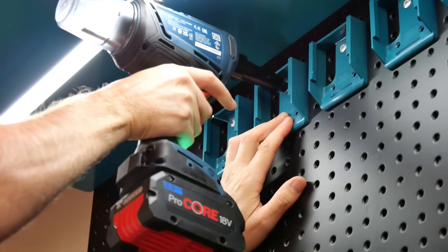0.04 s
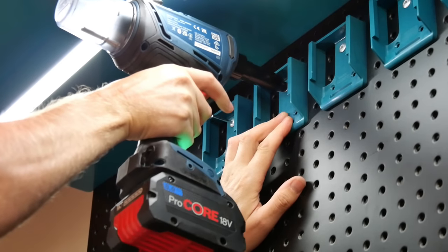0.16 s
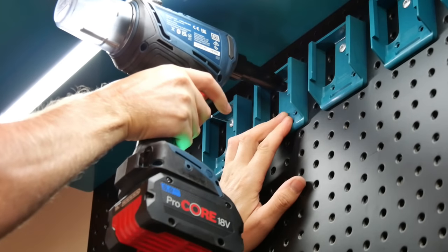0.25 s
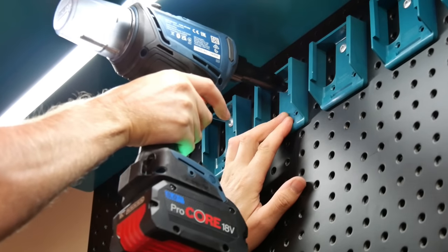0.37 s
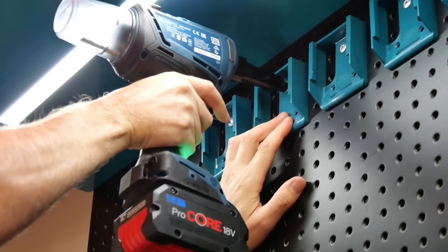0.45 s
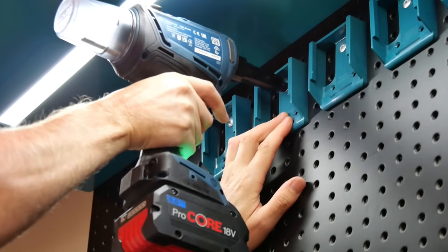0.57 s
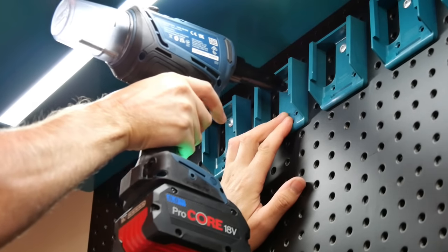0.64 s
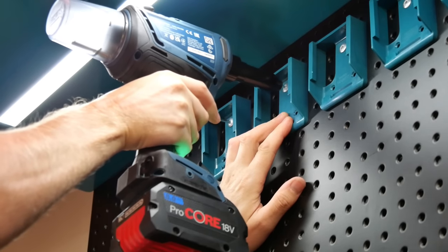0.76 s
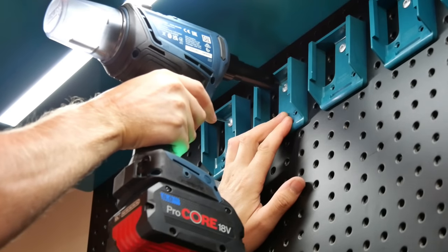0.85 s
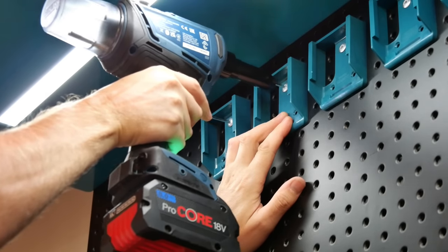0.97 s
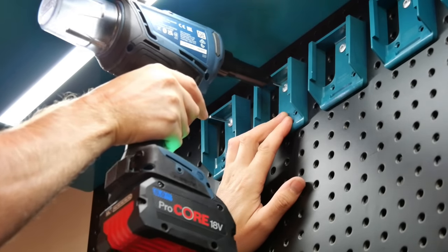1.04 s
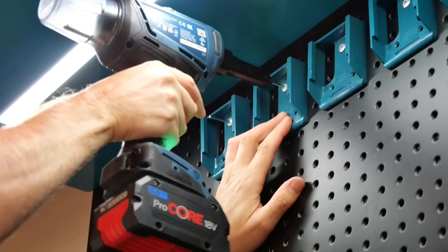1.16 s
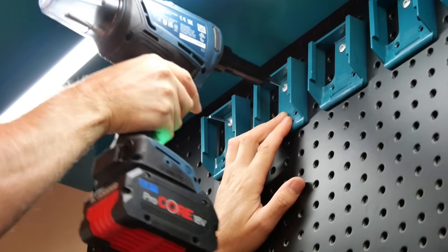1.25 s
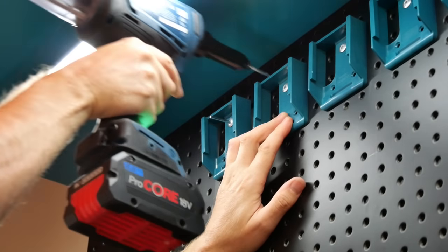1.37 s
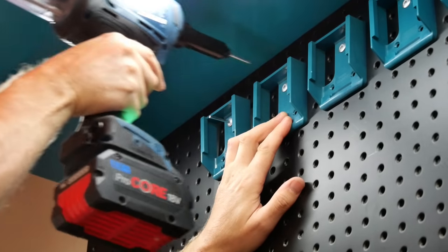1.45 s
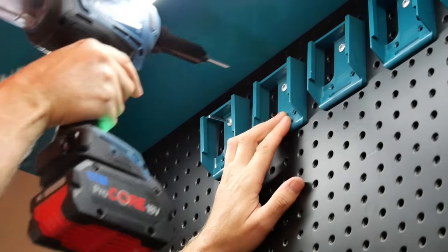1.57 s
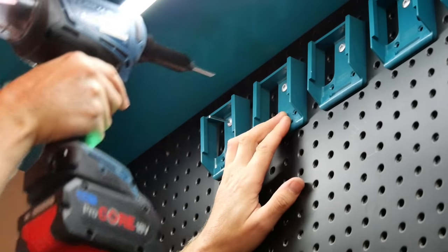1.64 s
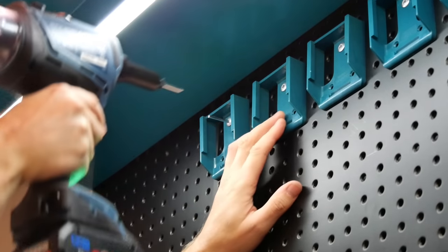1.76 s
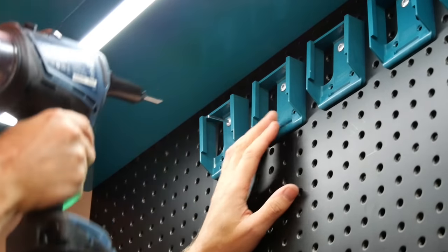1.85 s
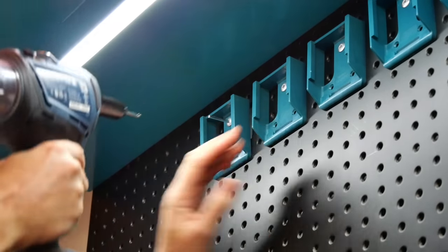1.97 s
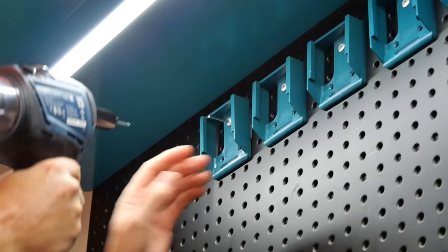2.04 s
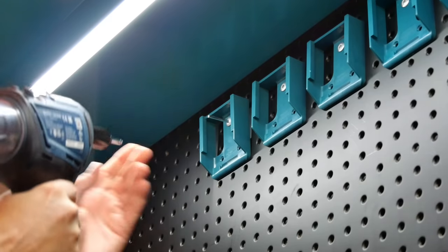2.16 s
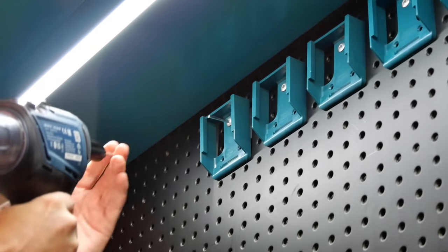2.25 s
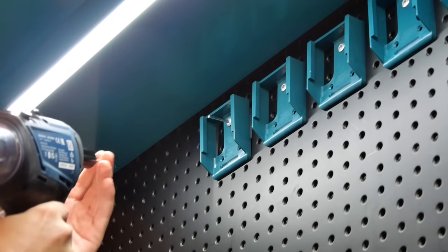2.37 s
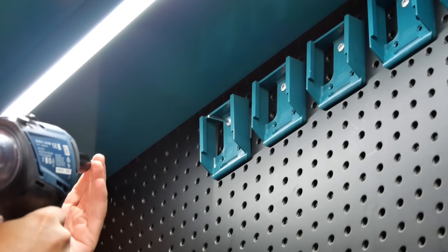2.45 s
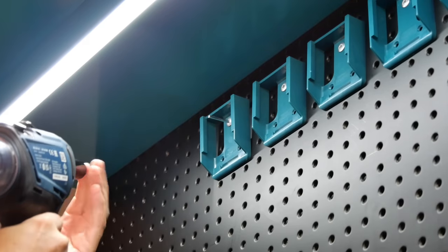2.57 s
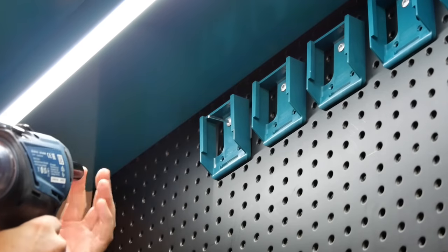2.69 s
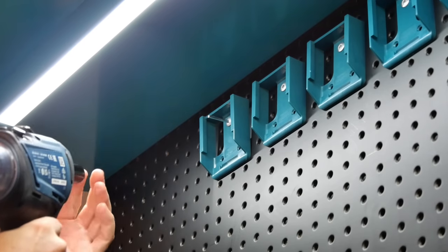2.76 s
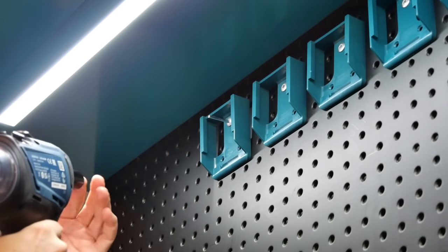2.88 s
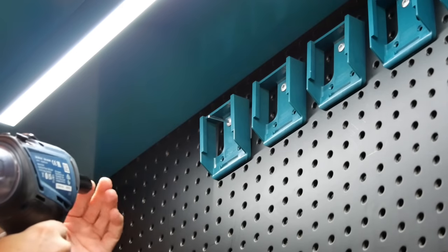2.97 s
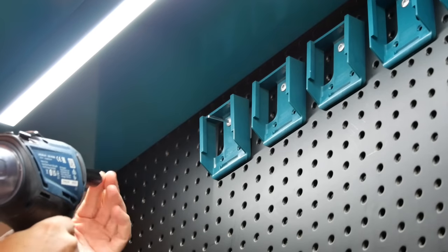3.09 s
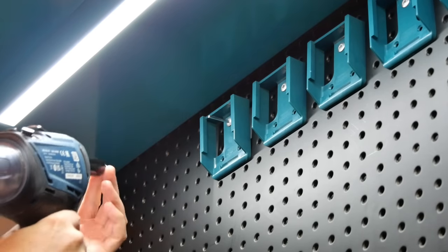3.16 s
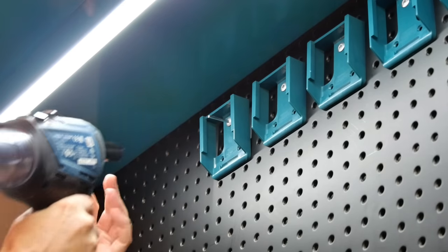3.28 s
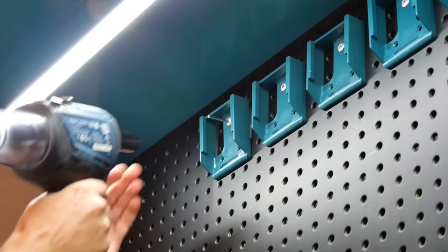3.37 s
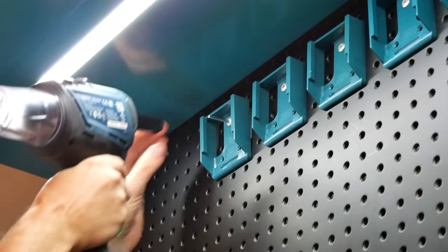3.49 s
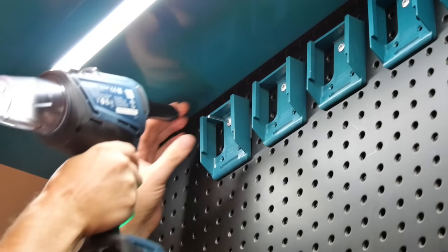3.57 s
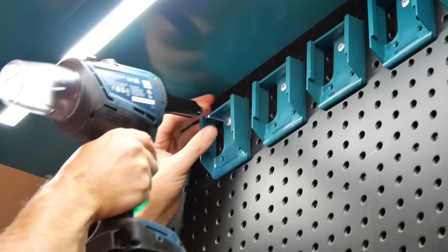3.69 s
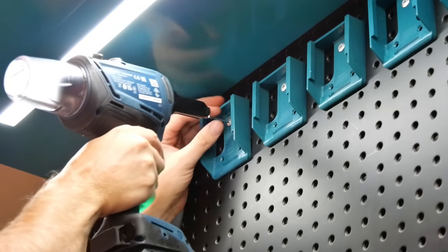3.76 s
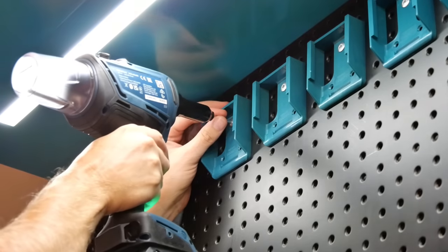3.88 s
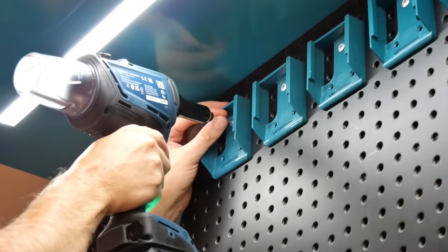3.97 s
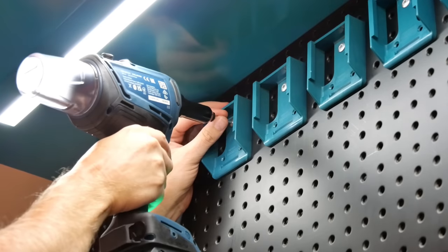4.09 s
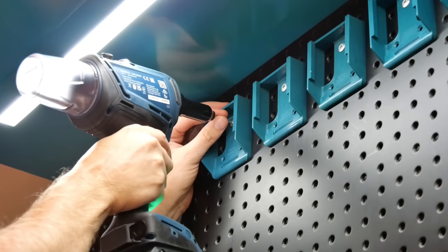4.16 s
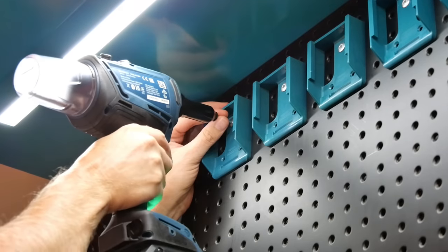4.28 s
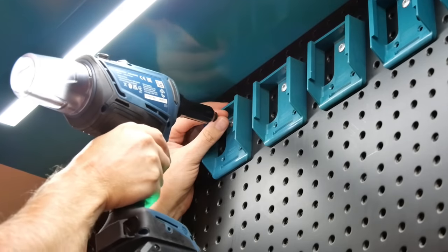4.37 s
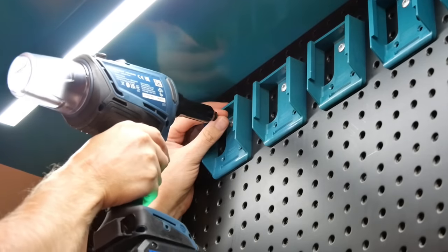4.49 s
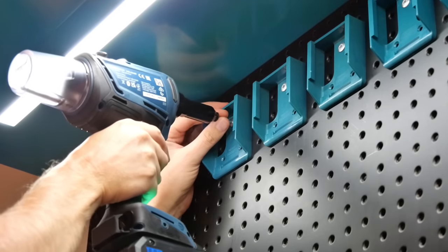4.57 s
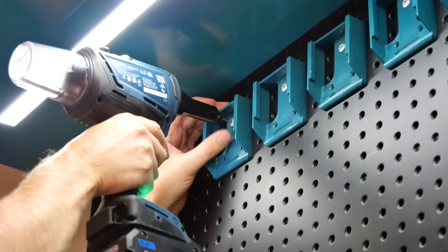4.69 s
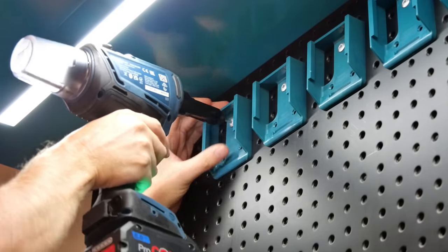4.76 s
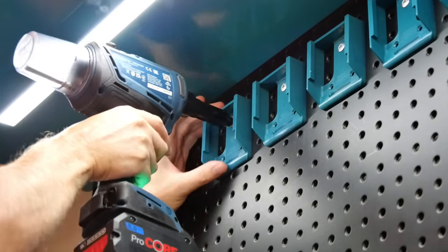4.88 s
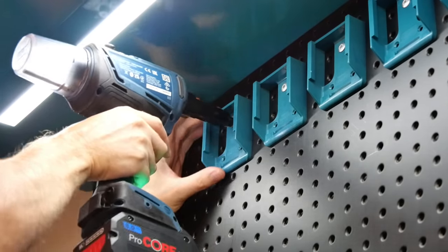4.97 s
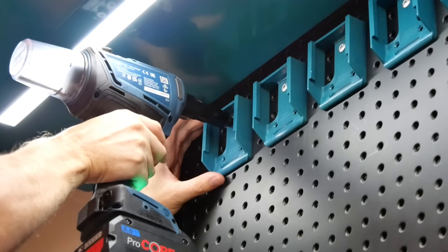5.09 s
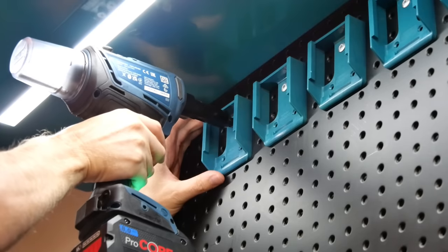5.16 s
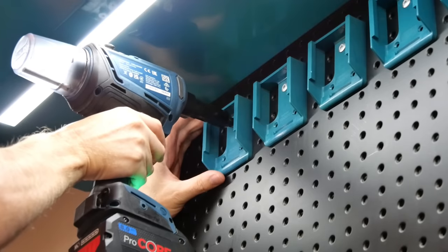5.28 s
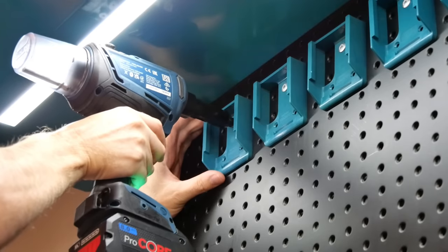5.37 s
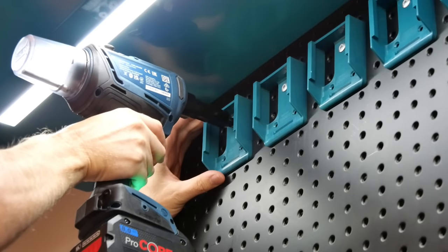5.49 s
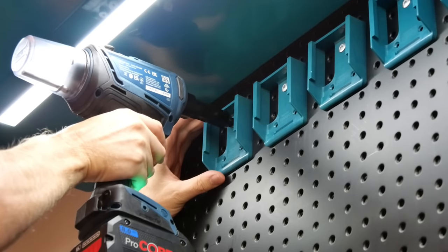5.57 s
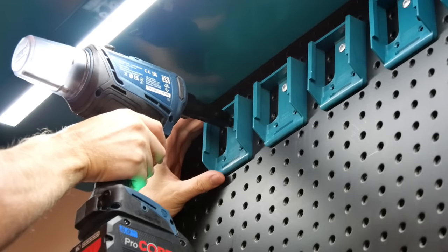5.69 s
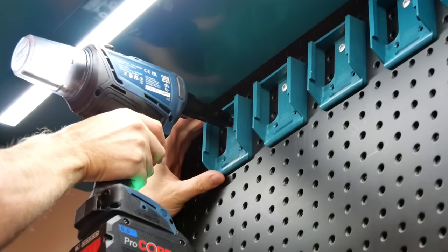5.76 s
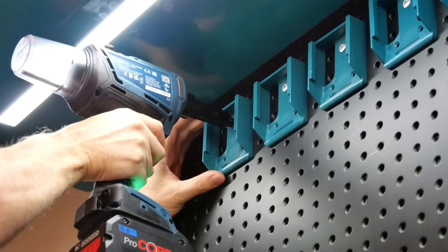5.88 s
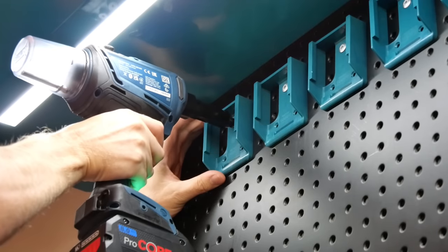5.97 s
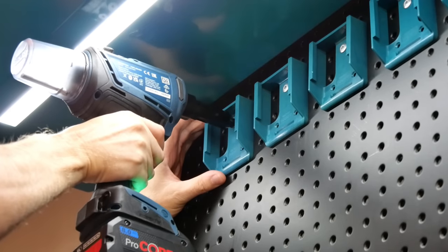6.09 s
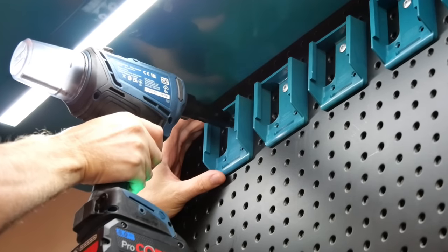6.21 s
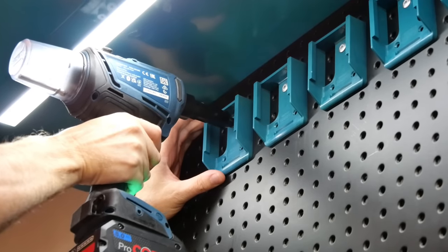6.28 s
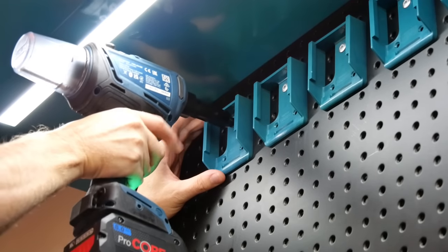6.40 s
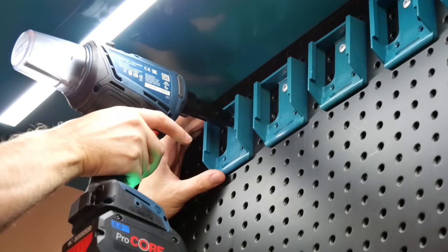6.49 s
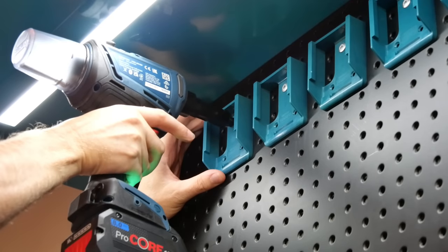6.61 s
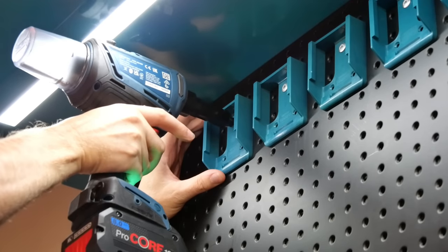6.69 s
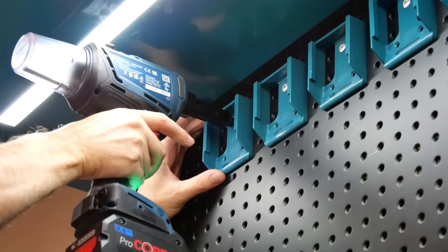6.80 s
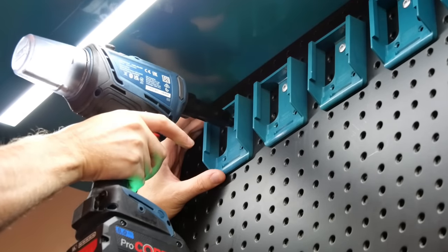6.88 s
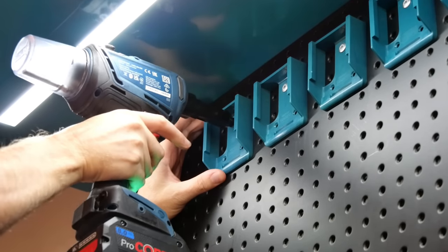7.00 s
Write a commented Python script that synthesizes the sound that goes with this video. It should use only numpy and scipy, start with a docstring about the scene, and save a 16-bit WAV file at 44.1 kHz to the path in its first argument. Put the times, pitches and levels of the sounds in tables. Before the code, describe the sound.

A close, nearly mono perspective in an echoing workshop, with low rumble, a faint machine hum and soft hiss. A rivet gun's geared motor is already straining at the start, whining harshly until a sharp metallic crack at about 0.25 seconds, with a bracket thud and ringing sheet; the motor coasts down in a loose rattle. Clicks near 0.57 lead into a lighter unloaded whir, cut at about 1.16 and slowing until 1.45, with a slide and panel knock around 1.3. From 2.1 to 2.6 come small metallic ticks and rubs, more at 3.2 to 3.6. Between 3.85 and 5 the rivet knocks and scrapes on the steel, with the strongest knock at 4.94. After near quiet, the trigger clicks at 6.05, the motor spins up, bites and strains, cracking at 6.67. It rattles down, then starts again at 6.98 with a click, cut off at 7.04.

```python
"""A whining geared motor is heard first, then the crack of a snapping mandrel and a free rattle running down.
A cordless rivet gun fixes steel brackets to a perforated wall panel in a workshop: the jaws run back,
a new rivet clicks into the nose, is knocked and scraped into its hole, and is pulled; another pull begins.
Motor speed and load drive gear noise and tones; impulses and friction grains ring the struck parts.
A diffuse room echo, low rumble, a machine's hum and a band of hiss lie behind."""
import sys
import numpy as np
from scipy import signal
from scipy.fft import rfft, irfft
from scipy.io import wavfile
from scipy.ndimage import uniform_filter1d

SR = 44100
rng = np.random.default_rng(int(sys.argv[2]) if len(sys.argv) > 2 else 0)


def generate_wav(signal):
    """Clip the signal to [-1, 1] and save it as 16-bit WAV at the path in sys.argv[1]."""
    frames = np.transpose(np.atleast_2d(signal))
    scaled = np.clip(frames, -1, 1) * 32767
    pcm = np.round(scaled).astype(np.int16)
    wavfile.write(sys.argv[1], SR, pcm)


N = 310464
TIME = np.arange(N) / SR
PULL_S = 0.609   # from the trigger to the snap


def from_db(db):
    """Decibels to gain."""
    return 10 ** (np.asarray(db) / 20)


def rms_one(x):
    """Scale to rms 1."""
    return x / np.sqrt(np.mean(x ** 2) + 1e-20)


def unit_energy(response):
    """Scale an impulse response to energy 1."""
    return response / np.sqrt(np.sum(response ** 2))


def in_time(rows):
    """Read a breakpoint curve at every sample."""
    return np.interp(TIME, *np.transpose(rows))


def at_hz(points, hz):
    """Read a table on a log-frequency axis."""
    point_hz, value = np.transpose(points)
    return np.interp(np.log(hz + 1), np.log(point_hz), value)


def colour(x, spectrum):
    """Give x a spectrum that falls away below its first point; rms 1."""
    hz = np.arange(len(x) // 2 + 1) * SR / len(x)
    low_fade = np.minimum(hz / spectrum[0][0], 1) ** 2
    return rms_one(irfft(rfft(x) * from_db(at_hz(spectrum, hz)) * low_fade, len(x)))


def drift(rate_hz):
    """Smooth random wandering with spread 1, made at every 40th sample and interpolated."""
    r = np.exp(-80 * np.pi * rate_hz / SR)
    noise = rng.standard_normal(N // 40 + 2002)
    slow = signal.lfilter([1], [1, -2 * r, r * r], noise)[2000:]   # drop the filter's start-up
    return np.interp(np.arange(N) / 40, np.arange(len(slow)), rms_one(slow))


def grains(per_s, spread_db):
    """Random tiny contacts of uneven size; rms 1."""
    sizes = from_db(spread_db * np.minimum(rng.exponential(1, N), 4)) * rng.standard_normal(N)
    return rms_one(sizes * (rng.random(N) < per_s / SR))


def blows(times, db):
    """One impulse for each blow that falls inside the scene."""
    out, at = np.zeros(N), np.round(times * SR).astype(int)
    out[at[at < N]] = from_db(db)[at < N]
    return out


def stroke(start, end, attack_s, release_s):
    """Swell up to the start, hold, die away after the end (times are time constants)."""
    return np.exp(-np.maximum(start - TIME, 0) / attack_s - np.maximum(TIME - end, 0) / release_s)


def through(x, response):
    """Play x through an impulse response."""
    return signal.fftconvolve(x, response)[:N]


def dying(t60):
    """A decay by 60 dB in t60 seconds, cut off after two seconds."""
    return from_db(-60 * TIME[:2 * SR] / t60)


def mode(hz, t60):
    """Response of one struck mode."""
    return np.sin(2 * np.pi * hz * TIME[:2 * SR]) * dying(t60)


def modes(table):
    """Response of a struck body, the sum of its modes."""
    return sum(from_db(db) * mode(hz, t60) for hz, db, t60 in table)


def dense_modes(spectrum, t60s):
    """Response of countless modes, each octave dying at its own pace."""
    noise = rfft(colour(rng.standard_normal(2 * SR), spectrum))
    octave = np.log2(np.clip(np.arange(SR + 1) / 2, 128, 16384))
    response = 0
    for k in range(7, 15):
        band = np.maximum(1 - abs(octave - k), 0)   # overlapping triangles, one per octave
        response = response + irfft(noise * band) * dying(at_hz(t60s, 2 ** k))
    return response


def burst(spectrum, t60):
    """Response of a noisy contact with a single decay."""
    return colour(rng.standard_normal(2 * SR), spectrum) * dying(t60)


# rivet pulls, levels before the mix: trigger_s, clatter_db, loaded_speed (turns per s),
# coasting_clatter_db, crack_db, bracket_thud_db
RIVET_PULLS = [(-.3552, -24, 323, -30.5, -7, -10.5), (6.06, -26, 319.5, -34, -5.5, -15.5),
               (6.98, -27.5, 320, -33, -7, -18)]
PULL_TURNS_PER_S, PULL_WHINE_DB, PULL_POWER = 390, -18.5, 1.13   # speed is that before the jaws grip
GRIP_S, GRIP_RISE_S = 0.152, 0.034   # trigger until the jaws take hold; load build-up time constant
UNLOAD_S = 0.012   # time constant of the load letting go after the snap
# the last strain before the snap slows the motor and dulls its whine
STRAIN_S, STRAIN_TURNS_PER_S, STRAIN_WHINE_DB = 0.055, 18, -6.5
BITE_DB = 4   # the gears crunch while the jaws bite


def pull(on, clatter_db, loaded_speed, coast_db):
    """The jaws grip and drag the motor down, most just before the snap; then it coasts to rest."""
    snap = on + PULL_S
    holding = np.exp(-np.maximum(TIME - snap, 0) / UNLOAD_S)
    closed = 1 - np.exp(-np.maximum(TIME - on - GRIP_S, 0) / GRIP_RISE_S)
    grip, bite = holding * closed, np.sin(np.pi * closed)
    strain = holding * np.clip(1 + (TIME - snap) / STRAIN_S, 0, 1)
    sag = (PULL_TURNS_PER_S - loaded_speed) * grip + STRAIN_TURNS_PER_S * strain
    slack_db = -9 * (1 - holding)   # nothing is left to drive once the mandrel has gone
    driven_db = clatter_db + slack_db + BITE_DB * bite
    whine_db = PULL_WHINE_DB + slack_db + STRAIN_WHINE_DB * strain
    return motor_run(on, snap, PULL_TURNS_PER_S, driven_db, PULL_POWER, coast_db, whine_db, grip, sag)


def jaw_return():
    """The jaws run back unloaded, so friction alone loads the motor."""
    return motor_run(on=0.574, off=1.157, top=360, clatter_db=-26, power=1.55, coast_db=-46, whine_db=-28)


SPIN_UP_TURNS_PER_S2, BRAKE_TURNS_PER_S2 = 2680, 1280
DRIVE_RELEASE_S = 0.021   # the driven clatter dies when the current is cut
IDLE_LOAD, COAST_LOAD = 0.49, 0.3   # friction alone, driven and coasting (0-1)
TIGHT_GEARS_DB = -1   # loaded teeth clatter less
COAST_POWER = 0.81   # coasting clatter grows with this power of the speed


def motor_run(on, off, top, clatter_db, power, coast_db, whine_db, grip=0, sag=0):
    """The motor spins up, holds and brakes; gives its speed, load, clatter gain and whine gain."""
    spin_up = SPIN_UP_TURNS_PER_S2 * (TIME - on)
    braking = top - BRAKE_TURNS_PER_S2 * (TIME - off)
    free = np.clip(np.minimum(spin_up, braking), 0, top)
    speed = np.maximum(free - sag, 0)
    pace = speed / top
    driven = np.exp(-np.maximum(TIME - off, 0) / DRIVE_RELEASE_S)
    friction = (free > 0) * (COAST_LOAD + (IDLE_LOAD - COAST_LOAD) * driven)
    load = friction + (1 - friction) * grip
    driven_clatter = driven * from_db(clatter_db + TIGHT_GEARS_DB * grip) * pace ** power
    coasting_clatter = (1 - driven) * from_db(coast_db) * pace ** COAST_POWER
    whine_gain = from_db(whine_db) * pace * driven ** 2
    return np.array([speed, load, driven_clatter + coasting_clatter, whine_gain])


def gear_tones(turns, tones, flutter_db, play):
    """Mesh tones flutter in level; play between the teeth (in turns) blurs the high ones most."""
    angle = 2 * np.pi * (turns + play * drift(45))
    total = 0
    for multiple, db in tones:
        level = np.sqrt(2) * from_db(db + flutter_db * drift(25))
        total = total + level * np.sin(multiple * angle + 2 * np.pi * rng.random())
    return total


# overtones of the loaded gears: multiple (of the motor speed), level_db
LOADED_MESH_TONES = [(1, -21.5), (2, -18), (4, -15.5), (4.32, -13), (6.5, -8), (9, -11.5), (10, -6),
                     (16, -24), (17, -25.5), (19, -12.5), (20, -4.5), (20.5, -12.5), (29.5, -15), (30, -17)]


def whine(speed, turns, load, gain, housing_hz=2560, width_hz=135):
    """Gears sing at eight times motor speed near a housing resonance; load adds other mesh tones."""
    resonance = 1 / np.sqrt(1 + ((8 * speed - housing_hz) / width_hz) ** 4)
    mesh = gear_tones(turns, [(8, 0)], flutter_db=1.6, play=0.009)
    others = gear_tones(turns, LOADED_MESH_TONES, flutter_db=2.5, play=0.0069)
    return gain * (from_db(1.0) * resonance * mesh + from_db(-3.5) * load ** 3 * others)


# tones of the free gears: multiple (of the motor speed), level_db
FREE_GEAR_TONES = [(1, -8.5), (2, -5.5), (3.55, -9), (5.15, -6), (5.83, -10), (8, -7), (9.5, -7), (24, -15)]
# spectra of gearbox noise, under load and running free: pitch_hz, level_db (per Hz, relative)
LOADED_GEAR_NOISE = [(100, -22.5), (250, -16.5), (400, -10.5), (700, -3), (1200, -6.5), (2200, -3),
                     (3200, 3), (4500, -3.5), (6300, -5), (7800, -9), (9500, -7.5), (12000, -11.5),
                     (15500, -21)]
FREE_GEAR_NOISE = [(150, -10.5), (300, -6), (450, -1.5), (700, 6), (1200, 3), (1800, 4), (2400, -1.5),
                   (3400, 0), (5200, -11), (9000, -14.5), (12000, -20), (15500, -35.5)]


def gearbox(speed, turns, load, clatter):
    """Teeth clatter in step with the shaft; load crossfades from free to loaded gear noise."""
    beat = 1 + 0.15 * np.sin(2 * np.pi * turns) + 0.11 * np.sin(np.pi * turns)
    teeth = grains(per_s=14000, spread_db=0.0) * beat
    loaded = from_db(5.5) * colour(teeth, LOADED_GEAR_NOISE)
    free = from_db(5.5) * colour(teeth, FREE_GEAR_NOISE)
    # the unloaded shaft hunts a little about its speed, so its tones waver
    wobble = 0.015 * drift(12)
    free_tones = gear_tones(turns + wobble, FREE_GEAR_TONES, flutter_db=3, play=0.01)
    tones = from_db(-2) * free_tones * (speed / speed.max()) ** 2
    return clatter * (load * loaded + (1 - load) * (free + tones))


def drive(speed, turns, chopper_hz=10000, stator_hz=2590):
    """As the motor gathers speed, chopped current whistles in two parting lines and the stator rings."""
    gathering = (np.gradient(speed) > 0) & (speed > 0) & (speed < 270)
    starting = uniform_filter1d(1.0 * gathering, size=256)
    lines = sum(np.sin(2 * np.pi * (chopper_hz * TIME + side * 4 * turns)) for side in (-1, 1))
    whistle = from_db(-51 + speed / 45) * lines
    stator = np.sin(2 * np.pi * stator_hz * TIME + 0.9 * drift(50))
    return starting * from_db(2 * drift(30)) * (whistle + from_db(-37.5) * stator)


# decay of the steel sheet: pitch_hz, t60_s
SHEET_DECAY = [(150, 1.2), (700, 0.6), (1840, 0.44), (4850, 0.21), (14000, 0.37)]
# ringing of the sheet: pitch_hz, level_db (per Hz, relative)
SHEET_RING = [(200, -10), (330, -10), (410, -4.5), (520, -5.5), (620, -4.5), (800, -1.5), (1200, -1.5),
              (1900, -5), (3000, -5.5), (4500, -12.5), (7000, -20), (10000, -22), (15000, -33)]


def sheet_ring():
    """Response of the perforated steel sheet, a dense field of modes."""
    return dense_modes(SHEET_RING, SHEET_DECAY)


# flexing of the sheet: pitch_hz, level_db (per Hz, relative)
SHEET_FLEX = [(70, -11), (110, -10.5), (150, -1.5), (235, 0.5), (310, -10.5), (1000, -45)]


def sheet_boom():
    """Response of the sheet flexing at low pitches."""
    return dense_modes(SHEET_FLEX, SHEET_DECAY)


# spectrum of the breaking mandrel: pitch_hz, level_db (per Hz, relative)
CRACK_SPECTRUM = [(200, -25.5), (800, -7), (1400, -15), (2600, 0), (5000, -1), (7500, 2), (10000, 4),
                  (13000, -3.5), (16000, -16)]
# slow flexing of the whole wall: pitch_hz, level_db (per Hz, relative)
WALL_SWAY = [(35, -2), (70, 1.5), (110, -8), (170, 1), (300, -31.5), (1000, -52.5)]


def snaps():
    """The mandrel breaks with a crack, the jaws rebound, the bracket thuds and the wall sways."""
    trigger, *_, crack_db, thud_db = np.transpose(RIVET_PULLS)
    snap_s = trigger + PULL_S
    crack = from_db(0.5) * burst(CRACK_SPECTRUM, t60=0.0118) + from_db(-5.5) * burst(CRACK_SPECTRUM, t60=0.05)
    rattle = from_db(-11.5) * burst(CRACK_SPECTRUM, t60=0.33)
    panel = from_db(-29.5) * sheet_ring() + from_db(-39) * sheet_boom()
    sway = from_db(-28) * burst(WALL_SWAY, t60=2.2) * (1 - dying(t60=0.6))   # builds up slowly
    thud = mode(hz=821, t60=0.02) + sway
    return through(blows(snap_s, crack_db), crack + rattle + panel) + through(blows(snap_s, thud_db), thud)


# clicks of trigger, jaws and rivet, levels before the mix: start_s, level_db, pitch_hz,
# nose_ring_db (relative to the click's level)
PART_CLICKS = [(0.5691, -23, 4200, -11), (0.5824, -21, 2510, -9), (2.0931, -31, 2340, -21),
               (2.1081, -32, 3200, -3.5), (2.1266, -24, 3450, -16), (2.1544, -29, 3160, -14),
               (2.2603, -32.5, 2740, -30), (2.3294, -37, 3000, -29), (2.4084, -36, 3000, -37),
               (2.5935, -30, 3560, -24), (2.6044, -42, 2900, -31), (3.2128, -30, 2800, -25),
               (3.4037, -35, 3130, -0.5), (3.4698, -42, 3180, -9), (3.876, -41, 4930, -18),
               (4.6299, -27, 3160, -30), (5.2901, -40, 5000, -23.5), (6.004, -40, 6500, -32),
               (6.0135, -29.5, 5340, -30), (6.026, -32, 3770, -13), (6.0621, -22.5, 2720, -8),
               (7.0274, -16, 2920, -25)]
# spectrum of a click: pitch_hz, level_db (per Hz, relative)
CLICK_SPECTRUM = [(300, -23), (480, 0.5), (750, -35), (1100, 1), (1500, -11), (2500, 3.5), (3400, -2),
                  (5000, -7), (9000, -11), (15000, -22)]
# modes of the nose piece: pitch_hz, level_db, t60_s
NOSE_MODES = [(1125, -4, 0.04), (2060, -2, .05), (2115, 9.5, 0.052), (2195, 10.5, 0.072), (2510, -4, 0.047),
              (3176, 12, 0.075)]
# spent mandrel, hand and rivet slide or rub on the gun: start_s, length_s, rustle_db, nose_ring_db
SLIDES_AND_RUBS = [(1.29, .07, -42, -60), (1.732, 0.29, -65, -74), (2.107, 0.062, -55, -49),
                   (2.31, .23, -64, -78), (2.393, .025, -60, -67), (2.575, 0.027, -56.5, -60),
                   (3.19, .015, -64, -55), (3.27, 0.032, -54, -51), (3.393, 0.11, -61, -61.5),
                   (3.537, 0.014, -70, -55), (3.59, 0.0088, -69, -60.5), (3.643, 0.0074, -69, -55),
                   (3.792, 0.039, -63, -57)]
RUB_ATTACK_S, RUB_RELEASE_S = 0.016, 0.011


def small_parts(click_t60=0.14, tone_t60=0.028, slip_hz=2300):
    """Parts click, each at its own pitch; mandrel, hand and rivet slide or rub; the nose piece rings."""
    start_s, level_db, pitch_hz, ring_db = np.transpose(PART_CLICKS)
    ticks = np.zeros(N + 2 * SR)
    for at, size, pitch in zip((start_s * SR).astype(int), from_db(level_db), pitch_hz):
        noise = from_db(-17.5) * burst(CLICK_SPECTRUM, click_t60)
        ticks[at:at + 2 * SR] += size * (noise + from_db(-9.5) * mode(pitch, tone_t60))
    nose = modes(NOSE_MODES)
    rings = through(blows(start_s, level_db + ring_db), from_db(-19.0) * nose)
    # one train of slips rustles directly and, softened, excites the nose
    slips = grains(per_s=1500, spread_db=0.0)
    rustle, ringing = np.zeros(N), np.zeros(N)
    for at, length, rustle_db, nose_db in SLIDES_AND_RUBS:
        motion = stroke(at, at + length, RUB_ATTACK_S, RUB_RELEASE_S)
        rustle += from_db(rustle_db) * motion
        ringing += from_db(nose_db) * motion
    soft_slips = signal.sosfilt(signal.butter(2, slip_hz, fs=SR, output="sos"), slips)
    rubbing = rustle * colour(slips, CLICK_SPECTRUM) + ringing * rms_one(through(soft_slips, nose))
    return ticks[:N] + rings + rubbing


# nose and bracket knock on the panel, levels before the mix: start_s, level_db, boom_db
PANEL_KNOCKS = [(1.315, -27.5, -33.5), (3.859, -37, -73), (3.908, -34.5, -57), (4.124, -38, -46.5),
                (4.279, -30, -44), (4.565, -38.5, -46.5), (4.63, -38, -49), (4.941, -18.5, -31.5),
                (4.965, -33, -45)]
# the rivet slides over the bracket, levels before the mix: start_s, length_s, level_db
BRACKET_SCRAPES = [(3.87, 0.024, -51), (4.116, 0.15, -57), (4.237, 0.053, -49), (4.338, 0.061, -54),
                   (4.559, 0.4, -45.5), (4.61, 0.027, -50)]
SCRAPE_ATTACK_S, SCRAPE_RELEASE_S = 0.023, 0.018
# modes of the bracket: pitch_hz, level_db, t60_s
BRACKET_MODES = [(429, -3.5, 0.075), (590, -3, 0.073), (860, -2, 0.063)]


def wall_panel():
    """Knocks and scraping ring the sheet; knocks also make it boom, and the scraped bracket groans."""
    sheet = sheet_ring()
    start_s, level_db, boom_db = np.transpose(PANEL_KNOCKS)
    pressure = np.zeros(N)
    for at, length, scrape_db in BRACKET_SCRAPES:
        pressure += from_db(scrape_db) * stroke(at, at + length, SCRAPE_ATTACK_S, SCRAPE_RELEASE_S)
    scraping = pressure * grains(per_s=320, spread_db=2)
    groan = through(from_db(-6.5) * scraping, unit_energy(modes(BRACKET_MODES)))
    boom = through(from_db(-12) * blows(start_s, boom_db), sheet_boom())
    knocked = through(from_db(-12.0) * blows(start_s, level_db), sheet)
    scraped = through(from_db(-1.0) * scraping, unit_energy(sheet))
    return knocked + scraped + groan + boom


# decay of the workshop's echo: pitch_hz, t60_s
ROOM_DECAY = [(150, 1.73), (700, 0.91), (2000, 0.66), (5000, 0.54), (14000, 0.36)]


def workshop(x):
    """Diffuse echo of the room: x through a swelling, dying noise tail of unit energy."""
    spectrum = [(60, 2), (700, -2.5), (3000, -5), (15000, -2.5)]   # pitch_hz, level_db
    tail = dense_modes(spectrum, ROOM_DECAY) * (1 - dying(t60=0.017))
    return through(x, unit_energy(tail))


# room rumble and the hiss band: pitch_hz, level_db (per Hz, relative)
RUMBLE_SPECTRUM = [(25, -1), (45, 2.5), (65, -12), (100, -7), (150, -16), (240, -15.5), (290, -21.5),
                   (700, -22.5), (1500, -25.5), (3000, -34), (4600, -38.5), (12000, -70)]
HISS_SPECTRUM = [(4000, -23.5), (4800, -12), (5500, -3), (7200, 1), (8700, -4.5), (9700, -3.5),
                 (11500, -16.5), (15500, -19.5)]
# tones of a machine's hum: pitch_hz, level_db (before the swell)
HUM_TONES = [(64.6, -52.5), (96.9, -67.5), (129.2, -67), (161.5, -67.5), (226.1, -68.5)]
# slow swell of the hum: start_s, level_db
HUM_LEVEL = [(0, -3), (1.4, -3), (2.3, -1), (4.2, 0.5), (5.6, -5), (7.04, -8)]


def background():
    """Room rumble and hiss from coloured noise, and a machine's hum from slowly wavering sines."""
    rumble = from_db(-54) * colour(rng.standard_normal(N), RUMBLE_SPECTRUM)
    hum = np.zeros(N)
    for hz, db in HUM_TONES:
        level = np.sqrt(2) * from_db(db + 1.1 * drift(0.73))
        hum += level * np.sin(2 * np.pi * hz * TIME + 0.3 * drift(0.93))
    hiss = from_db(-62) * colour(rng.standard_normal(N), HISS_SPECTRUM)
    return rumble + from_db(in_time(HUM_LEVEL)) * hum + hiss


def scene():
    """Gun and panel dry in the middle, nearly mono, the room behind them."""
    speed, load, clatter, whine_gain = jaw_return() + sum(pull(*row[:4]) for row in RIVET_PULLS)
    # the speed wavers by a small share as the shaft angle accumulates
    turns = np.cumsum(speed * (1 + 0.003 * drift(5))) / SR
    load = np.clip(load, 0, 1)
    tones = whine(speed, turns, load, whine_gain) + drive(speed, turns)
    gears = gearbox(speed, turns, load, clatter)
    contacts = snaps() + small_parts() + wall_panel()
    echo = workshop(from_db(-5.5) * (gears + contacts) + from_db(-18) * tones)
    mid = tones + gears + contacts + echo + background()
    # only diffuse echo and a little background differ between left and right
    side_echo = workshop(from_db(-27) * gears + from_db(-32.5) * contacts + from_db(-28.5) * tones)
    side = side_echo + from_db(-20) * background()
    return np.array([mid + side, mid - side])


def record(dry, cutoff_hz=15900):
    """The sharpest peaks are clipped, then a steep low-pass cuts the top."""
    low_pass = signal.ellip(10, 0.1, 80, cutoff_hz, fs=SR, output="sos")
    return signal.sosfilt(low_pass, np.clip(dry, -0.8, 0.8))


dry = scene()
out = record(dry)
generate_wav(out)
```